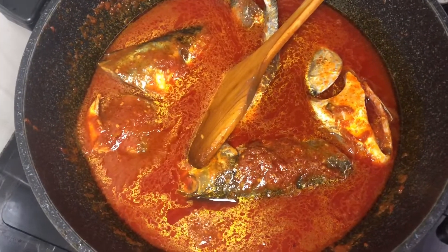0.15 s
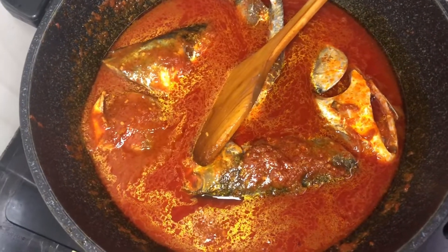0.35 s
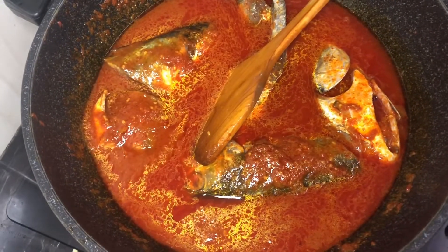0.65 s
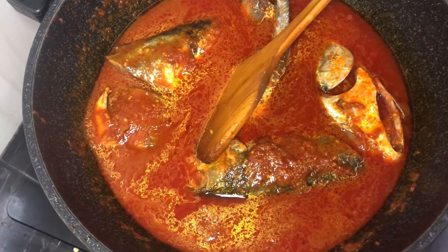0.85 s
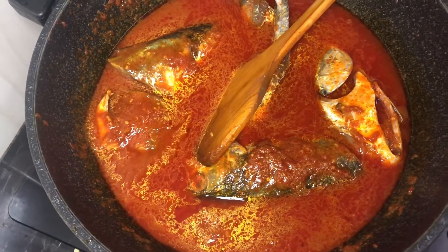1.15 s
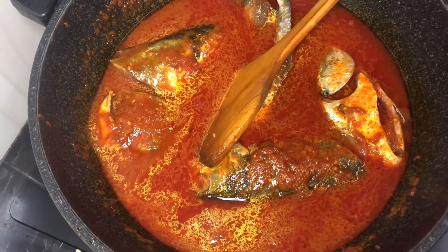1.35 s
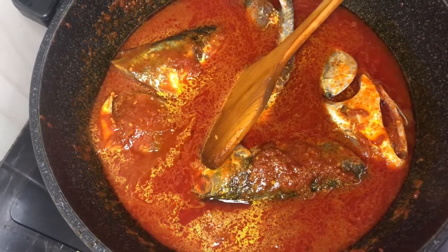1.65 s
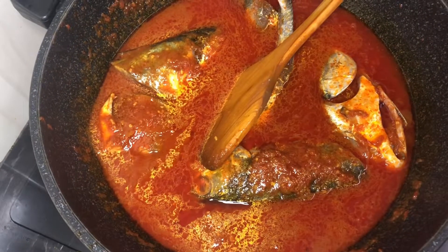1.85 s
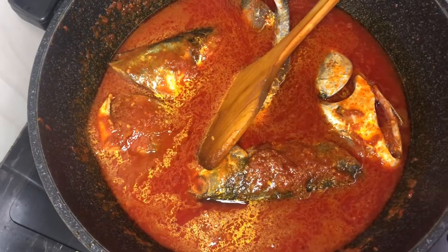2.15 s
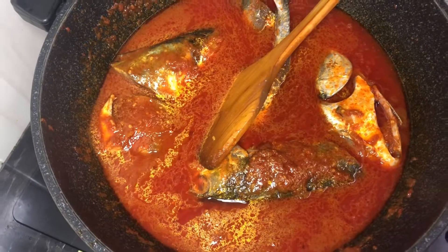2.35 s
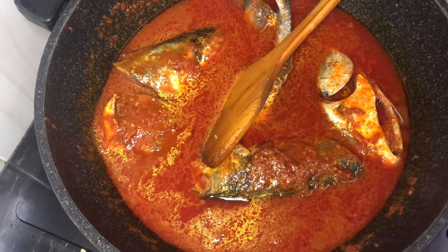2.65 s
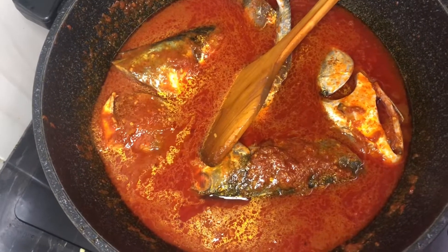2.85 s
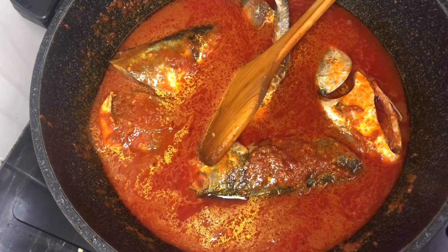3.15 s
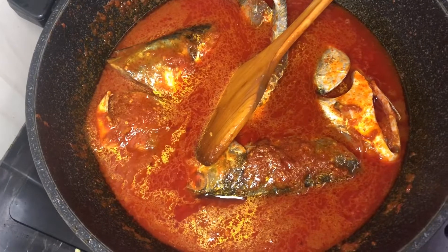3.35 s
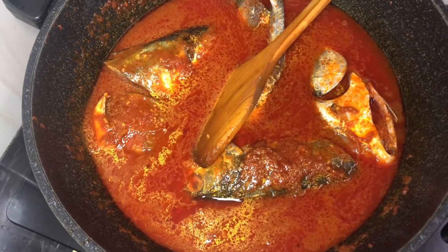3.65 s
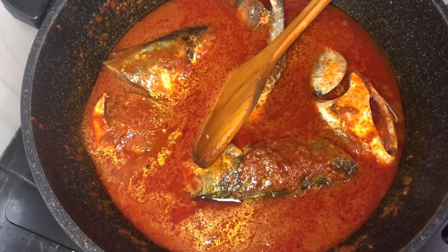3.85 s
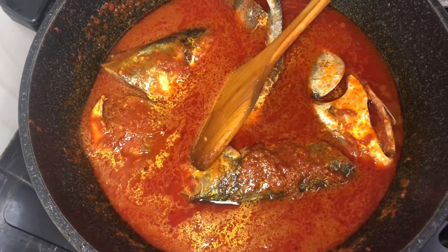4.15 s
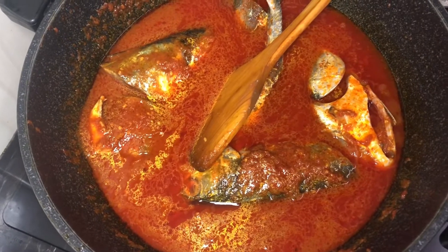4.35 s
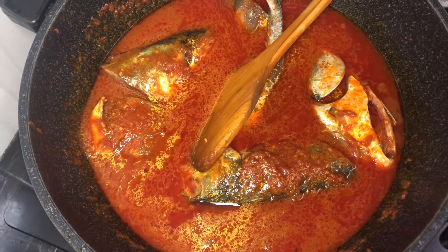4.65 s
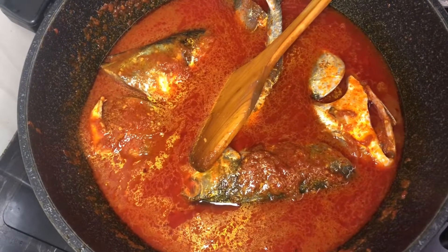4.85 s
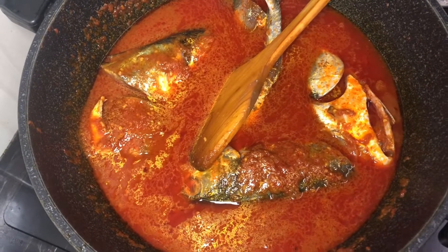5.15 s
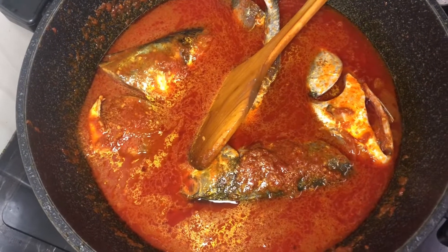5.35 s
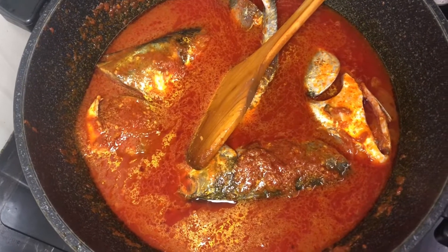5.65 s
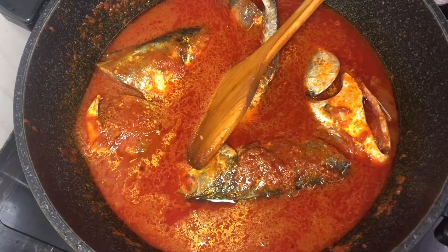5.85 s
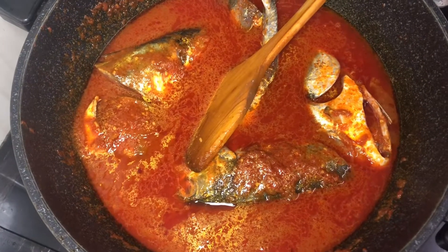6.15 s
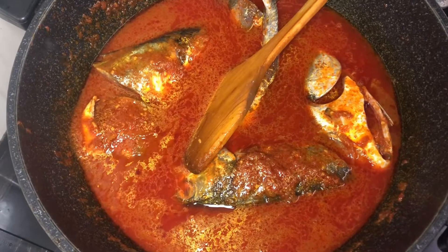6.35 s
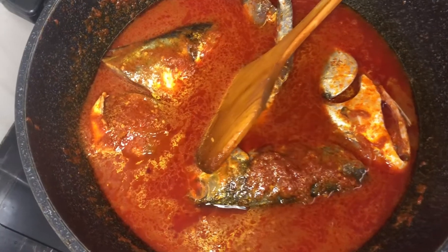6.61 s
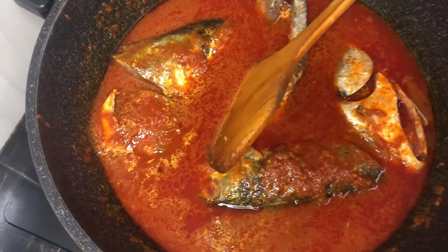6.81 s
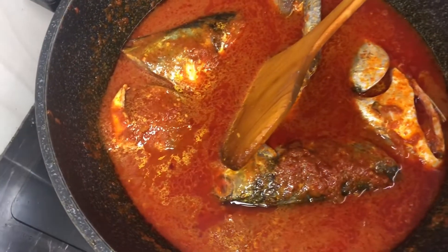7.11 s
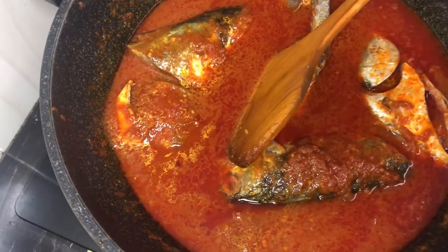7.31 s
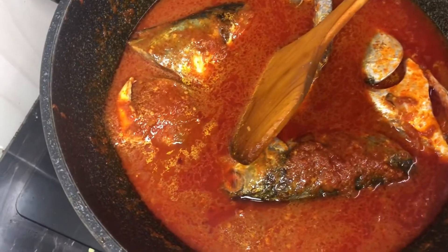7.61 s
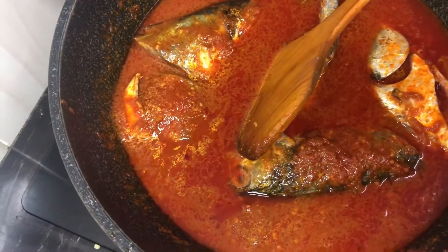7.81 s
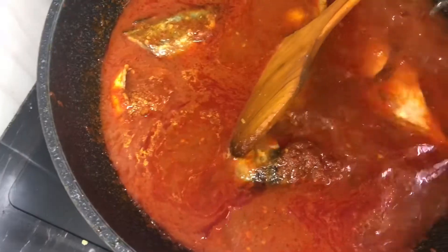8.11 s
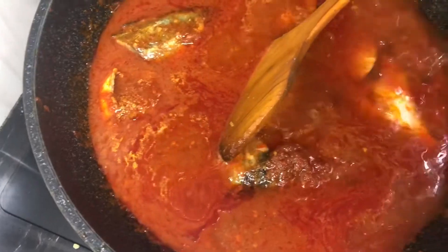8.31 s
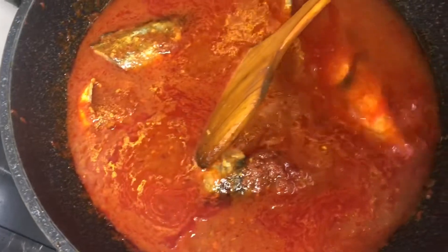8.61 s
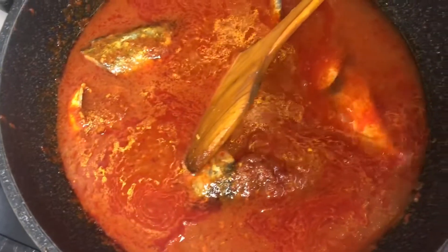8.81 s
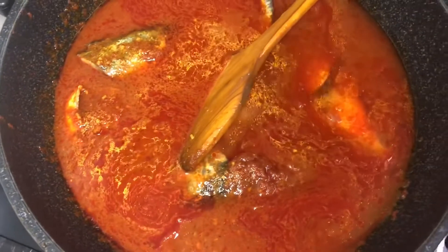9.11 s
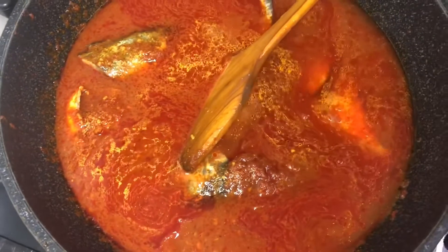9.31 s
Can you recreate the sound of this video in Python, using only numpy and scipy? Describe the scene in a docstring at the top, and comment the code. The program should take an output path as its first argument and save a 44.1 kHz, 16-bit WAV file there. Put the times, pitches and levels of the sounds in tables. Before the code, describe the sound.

A pan of stew simmers softly close by, over a low appliance hum and rush of air. Across the kitchen a tap hisses on thin metal, and a pot knocks, scrapes and clinks in a booming sink, then fills with churning water. The tap stops. Water gushes and drips into the near pan, the sound briefly fades out and returns, the stew seethes, and a wooden spatula knocks the pan.

```python
"""A pan of stew simmers over appliance hum: a soft rush of air, with tiny bubbles spitting at the hot rim.
A tap hisses on thin metal. Across the kitchen a pot knocks, scrapes and clinks in the booming sink,
then churns and sings as it fills. A faint sizzle lingers, then water gushes and drips into the pan,
each drop a slap and a bubble; the stew seethes, the spitting flares and a wooden spatula knocks the pan.
The whole sound fades out and back in once, near 8 s."""
import sys
import numpy as np
from scipy import signal
from scipy.io import wavfile
from scipy.ndimage import uniform_filter1d

SR = 44100
rng = np.random.default_rng(int(sys.argv[2]) if len(sys.argv) > 2 else 0)


def master(y):
    """Save y as 16-bit WAV."""
    cut = np.clip(np.atleast_2d(y).T, -1, 1)
    pcm = np.round(cut * 32767)  # scale
    wavfile.write(sys.argv[1], SR, pcm.astype(np.int16))


N = 417627
T = np.arange(N) / SR

# Noise and impact spectra. Each row: frequency in Hz, relative level in dB.
AIR_SPECTRUM = [(15, -60), (25, -32), (64, -35.5), (80, -5.5), (102, -3.5), (161, -12.5), (189, -10),
                (333, -23.5), (557, -24), (691, -22), (1040, -23.5), (1780, -27.5), (2150, -28),
                (6850, -37.5), (15800, -47.5)]
SEETHE_SPECTRUM = [(400, -22), (900, -9.5), (1450, -2), (1900, -6.5), (2400, -4.5), (3100, -3), (4200, -9),
                   (6000, -13), (8500, -21.5), (15500, -17)]
SPRAY_SPECTRUM = [(500, -12.5), (1500, -1.5), (3000, -5.5), (5000, -2.5), (7000, -0.5), (9500, -1.5),
                  (12000, 0.5), (15500, -0.5)]
CHURN_SPECTRUM = [(400, -28), (1000, -7), (1500, -11.5), (1900, -3), (3300, -2), (4600, -3), (7000, -7.5),
                  (10000, -12)]
SINK_SPECTRUM = [(300, -27.5), (560, -8.5), (700, 2), (950, 2.5), (1400, -5), (2600, -1), (4500, -7),
                 (9000, -9.5), (15500, -16.5)]
RATTLE_SPECTRUM = [(60, -24), (130, -1), (250, 2), (450, -12.5), (900, -26), (4000, -62)]
POT_SPECTRUM = [(500, -27), (1500, -13.5), (1900, -3), (2600, -3), (3300, -1), (4800, -4), (5700, -4),
                (6800, -5), (8000, -5), (11000, -8), (15500, -15.5)]
WOOD_SPECTRUM = [(300, -17), (600, -7), (1300, -3), (2500, 8), (4000, 1.5), (6300, -2), (7500, -16),
                 (15500, -19)]
# Hollow resonances of hob and filling pot. Each row: centre in Hz, width in Hz, strength in dB.
HOB_PEAKS = [(440, 147, -1), (707, 88, -2), (930, 18, -0.5), (1390, 120, -8.5), (1824, 94, -2)]
POT_PEAKS = [(1820, 87, -12), (2150, 84, -3.5), (2800, 220, -7), (3260, 130, -5), (6800, 610, -9)]
# Modes of struck bodies. Each row: frequency in Hz, relative level in dB, free-ringing T60 in seconds.
SINK_RING_MODES = [(613, 0, .35), (725, -4, .25), (862, -3, .18), (915, -4, .12), (1135, -9, .5),
                   (1280, -10, .2), (1482, -5, .2), (2325, -9, .15), (2490, -6, .17), (2915, -11, .1)]
BASIN_MODES = [(108.6, -2, 0.16), (164, -4.5, 0.18), (195, -3, 0.35), (228, 5, 0.13), (286, -7, 0.11),
               (465, -5.5, 0.26)]
POT_WALL_MODES = [(1781, -4, .35), (3193, 2, .2), (3397, 1, .18), (4680, 0, .07), (4862, 0, .16),
                  (5920, -6, .14), (6725, 0, .2), (6888, -2, .14), (9700, -5, .15), (14000, -4, .1)]
PAN_MODES = [(153, -3.5, 0.13), (263, -6, 0.079), (332, -1.5, 0.058), (380, 5, 0.059), (420, -10, 0.063)]
# Level curves of seething stew, jet on metal and churn in the pot. Each row: time in seconds, level in dB.
SEETHE_CURVE = [(7.05, -60), (7.9, -57), (8.25, -52.5), (8.55, -47), (9.1, -47), (9.46, -57)]
JET_CURVE = [(.5, -46.5), (.7, -44), (.87, -38), (1.18, -43), (1.45, -50.5), (2.75, -44), (3.35, -50),
             (3.7, -46), (4.1, -43), (4.5, -47.5), (5.8, -46.5)]
CHURN_CURVE = [(1.7, -45.5), (2.85, -41.5), (3.25, -45.5), (3.7, -41), (4.0, -46), (4.45, -44), (4.9, -43),
               (5.45, -43), (5.8, -44)]
# Appliance tones. Each row: frequency in Hz, RMS level in dB.
HUM_TONES = [(49, -63.5), (93.6, -50.5), (100.05, -44), (120.2, -52.5), (130.1, -56.5), (186, -74),
             (200.1, -60.5), (231, -60)]
# Pot knocks on the sink. Each row: start in seconds, relative level in dB, spot note in Hz.
POT_KNOCKS = [(1.187, -21, 1600), (1.243, -26.5, 2800), (1.442, -31, 2450), (1.513, -31.5, 3040),
              (1.575, -29.5, 2470), (1.633, -23, 2690), (1.673, -28.5, 1380), (2.463, -29, 1190),
              (2.513, -31.5, 2000), (2.685, -26.5, 2910), (3.315, -36.5, 1230)]
# Pot scrapes. Each row: start in seconds, relative level in dB, decay in seconds, spot note in Hz.
POT_SCRAPES = [(1.283, -31.5, 0.11, 900), (1.532, -23, 0.024, 930), (1.612, -30.5, 0.022, 900),
               (1.719, -24.5, 0.046, 1200), (2.555, -42.5, 0.091, 615), (2.72, -36.5, 0.069, 2420)]
# Booms of the sink floor. Each row: start in seconds, relative level in dB.
BASIN_BOOMS = [(1.2476, -15.5), (1.324, -24), (1.381, -24.5)]
# Clinks and slides. Each row: start in seconds, relative level in dB, decay in seconds,
# tilt in dB per octave, spot note in Hz.
POT_CLINKS = [(2.0111, -19.5, 0.011, -2.5, 4780), (2.045, -24, 0.072, 3, 6800),
              (2.088, -25.5, 0.026, 5, 3320), (2.932, -27, .016, -3.5, 6960), (2.962, -35, 0.031, -5, 4960)]
# A faint lingering sizzle, then gushes of water. Each row: start in seconds, level in dB,
# rise in seconds, decay in seconds.
SIZZLE_AND_GUSHES = [(6.15, -59, .02, 1), (7.062, -40, 0.06, 0.1), (7.53, -40.5, .03, 0.054),
                     (7.745, -45, .03, 0.084)]
# Drops into the stew. Each row: start in seconds, level in dB, bubble pitch in Hz, slap in dB re bubble.
WATER_DROPS = [(7.264, -41.5, 7140, 4.5), (7.298, -34.5, 6760, -6.5), (7.4633, -28, 1256, -4),
               (7.473, -35, 8240, 2.5), (7.481, -38, 2800, 4), (7.525, -29.5, 1210, -3),
               (7.536, -25.5, 1406, -1.5), (7.541, -30, 485, -14), (7.554, -26.5, 2800, -7),
               (7.607, -35, 6800, 3), (7.719, -28, 3660, -8), (7.746, -32, 12800, -2.5),
               (7.789, -33.5, 13000, -2), (7.821, -31.5, 510, 4), (7.841, -39, 1730, 1),
               (8.257, -41, 9000, -7), (8.336, -32, 14200, -15), (8.361, -38, 12300, -11)]
# Spatula on pan. Each row: start in seconds, crack level in dB, crack decay in seconds,
# tilt in dB per octave, thud level in dB.
SPATULA_HITS = [(7.8171, -21.5, 0.003, -0.5, -51), (9.2283, -25, 0.006, -3.5, -22),
                (9.2886, -31, 0.0062, -4.5, -28)]
# Kitchen reverberation. Each row: frequency in Hz, T60 in seconds.
ROOM_T60 = [(150, 1), (1000, 0.4), (5000, 0.47), (15000, 0.13)]


def amp(db):
    return 10 ** (np.asarray(db) / 20)


def unit_rms(x):
    return x / np.sqrt(np.mean(x ** 2) + 1e-20)


def at_hz(rows, hz):
    row_hz, values = np.transpose(rows)
    return np.interp(np.log(hz + 1), np.log(row_hz + 1), values)


def curve_gain(rows):
    times_s, db = np.transpose(rows)
    return amp(np.interp(T, times_s, db))


def held(start_s, end_s, rise_s, fall_s):
    """Linear rise, hold until end_s, exponential fall."""
    return np.clip((T - start_s) / rise_s, 0, 1) * np.exp(-np.maximum(T - end_s, 0) / fall_s)


def add(mix, start_s, sound):
    part = mix[round(start_s * SR):][:len(sound)]
    part += sound[:len(part)]


def colour(x, spectrum, tilt_db_oct=0, peaks=()):
    """Minimum-phase filter of unit energy: a tilted spectrum with resonant humps."""
    hz = np.fft.rfftfreq(8192, 1 / SR)
    gain = amp(at_hz(spectrum, hz) + tilt_db_oct * np.log2(hz + 1))
    gain *= 1 + sum(amp(db) / (1 + (2 * (hz - centre) / width) ** 2) for centre, width, db in peaks)
    log_gain = np.log(np.concatenate([gain, gain[-2:0:-1]]))
    taps = np.fft.ifft(np.exp(np.conj(signal.hilbert(log_gain)))).real[:len(hz)]
    return signal.oaconvolve(x, taps / np.linalg.norm(taps))[:len(x)]


def patchy(x, depth_db, bins, frames):
    """Random patches of loudness across frequency and time."""
    spectra = signal.stft(x, nperseg=512)[2]
    patches = uniform_filter1d(rng.standard_normal(spectra.shape), bins, axis=0)
    patches = unit_rms(uniform_filter1d(patches, frames, axis=1))
    return unit_rms(signal.istft(spectra * amp(depth_db * patches), nperseg=512)[1][:N])


def bubble(hz, decay_s, t, glide=0.026):
    """A bubble rings, rising in pitch as it nears the surface."""
    pitch_hz = hz * (1 + glide * np.minimum(t / decay_s, 2))
    return np.sin(2 * np.pi * np.cumsum(pitch_hz) / SR) * np.exp(-t / decay_s) * (1 - np.exp(-t * hz))


def droplets(per_s, spread_db, lo_hz, hi_hz, decay_cycles, pitches=36):
    """Tiny bubbles ping at random times; a few are loud."""
    strength = amp(spread_db * np.minimum(rng.exponential(1, N), 4))
    pulses = strength * rng.choice([-1, 1], N) * (rng.random(N) < per_s / SR)
    pitch_index = rng.integers(0, pitches, N)
    out = np.zeros(N)
    for k, hz in enumerate(np.geomspace(lo_hz, hi_hz, pitches)):
        ping = unit_rms(bubble(hz, decay_cycles / hz, T[:1024]))
        out += signal.oaconvolve(pulses * (pitch_index == k), ping)[:N]
    return unit_rms(out)


def simmer(air_db=-45, spit_db=-69.5, flare_db=-52):
    """Steady air round the hob; late on the stew seethes. The hot rim spits, flaring when wet."""
    air = patchy(rng.standard_normal(N), depth_db=1.3, bins=8, frames=8)
    air = colour(air, AIR_SPECTRUM, peaks=HOB_PEAKS)
    hum_gap = signal.butter(2, [88, 108], "bandstop", fs=SR, output="sos")
    air = unit_rms(signal.sosfilt(hum_gap, air))
    seethe = patchy(rng.standard_normal(N), depth_db=2.1, bins=8, frames=5)
    seethe = unit_rms(colour(seethe, SEETHE_SPECTRUM))
    seethe_gain = curve_gain(SEETHE_CURVE) * (T > SEETHE_CURVE[0][0])
    spits = droplets(per_s=210, spread_db=4.5, lo_hz=8000, hi_hz=16100, decay_cycles=3.3)
    flare = amp(flare_db) * held(start_s=7.82, end_s=8.35, rise_s=0.41, fall_s=0.034)
    return amp(air_db) * air + seethe_gain * seethe + (amp(spit_db) + flare) * spits


def appliance_hum(waver_rad=0.17):
    """Mains and motor tones wander slightly and beat."""
    out = np.zeros(N)
    knots_s = np.linspace(0, T[-1], num=24)
    for hz, db in HUM_TONES:
        drift_rad = waver_rad * np.interp(T, knots_s, rng.standard_normal(len(knots_s)))
        out += np.sqrt(2) * amp(db) * np.sin(2 * np.pi * (hz * T + rng.random()) + drift_rad)
    return out


def shell(x, t60_s):
    """Dense, short resonances of thin metal, different at every spot."""
    t = T[:SR // 8]
    response = rng.standard_normal(len(t)) * amp(-60 * t / t60_s)
    return signal.oaconvolve(x, response / np.linalg.norm(response))[:len(x)]


def ring(modes):
    """Decaying sines of a struck body."""
    t = T[:SR // 2]
    return sum(amp(db - 60 * t / t60_s) * np.sin(2 * np.pi * hz * t) for hz, db, t60_s in modes)


def resonate(x, modes):
    """Modes driven by x, at unit RMS."""
    return unit_rms(signal.oaconvolve(x, ring(modes))[:len(x)])


def spray():
    """Water hisses as it breaks up on thin metal."""
    hiss = colour(patchy(rng.standard_normal(N), depth_db=3.0, bins=28, frames=5), SPRAY_SPECTRUM)
    return unit_rms(hiss + 0.45 * shell(hiss, t60_s=0.09))


def tap(open_s=0.487, shut_s=5.8, pot_free_s=2.83, sing_db=-57, ring_out_db=-44.5):
    """The jet drums on metal and churns in the pot; standing free, the pot rings out, then sings on."""
    settle_s, shut_fall_s, wet_t60_s = 0.12, 0.07, 0.04
    bubbles = droplets(per_s=900, spread_db=2.5, lo_hz=900, hi_hz=9250, decay_cycles=15.4)
    churn = patchy(rng.standard_normal(N) + 0.52 * bubbles, depth_db=1.8, bins=12, frames=14)
    churn += 0.5 * shell(churn, t60_s=0.12)
    churn = unit_rms(colour(churn, CHURN_SPECTRUM, peaks=POT_PEAKS))
    lowest_hz = POT_WALL_MODES[0][0]
    pot_note = resonate(churn, [(lowest_hz, 0, wet_t60_s)])
    jet_gain = curve_gain(JET_CURVE) * held(open_s, shut_s, rise_s=0.023, fall_s=shut_fall_s)
    churn_gain = curve_gain(CHURN_CURVE) * held(CHURN_CURVE[0][0], shut_s, settle_s, shut_fall_s)
    singing = amp(sing_db) * held(pot_free_s, shut_s, settle_s, shut_fall_s)
    ring_out = amp(ring_out_db) * held(pot_free_s, pot_free_s + settle_s, settle_s, fall_s=0.26)
    return jet_gain * spray() + churn_gain * churn + (singing + ring_out) * pot_note


def contact(rise_s, decay_s):
    """Noise burst of two surfaces meeting."""
    t = T[:SR // 2]
    envelope = np.minimum(t / rise_s, 1) * np.exp(-np.maximum(t - rise_s, 0) / decay_s)
    return envelope * rng.standard_normal(len(t))


def clatter(blows, spectrum, modes, ring_db, shell_db, spot_db, spot_t60_s):
    """Each blow sounds directly and rings the metal; the struck spot adds its own short note."""
    out = np.zeros(N)
    for start_s, db, rise_s, decay_s, tilt_db_oct, spot_hz in blows:
        force = contact(rise_s, decay_s)
        body = amp(ring_db) * resonate(force, modes)
        spot = amp(spot_db) * resonate(force, [(spot_hz, 0, spot_t60_s)])
        knock = colour(force, spectrum, tilt_db_oct)
        knock = unit_rms(knock + amp(shell_db) * shell(knock, t60_s=0.042))
        add(out, start_s, amp(db) * np.std(force) * (knock + body + spot))
    return out


def pot_on_sink(knock_rise_s=0.0004, knock_decay_s=0.023, scrape_rise_s=0.012):
    """Sharp knocks and softer-edged scrapes; a stiffer spot rings higher and brighter."""
    knocks = [(start_s, db, knock_rise_s, knock_decay_s, hz) for start_s, db, hz in POT_KNOCKS]
    scrapes = [(start_s, db, scrape_rise_s, decay_s, hz) for start_s, db, decay_s, hz in POT_SCRAPES]
    blows = []
    for start_s, db, rise_s, decay_s, spot_hz in knocks + scrapes:
        tilt_db_oct = -1.5 + 2.1 * np.log2(spot_hz / 1500)
        blows.append((start_s, db, rise_s, decay_s, tilt_db_oct, spot_hz))
    return clatter(blows, SINK_SPECTRUM, SINK_RING_MODES,
                   ring_db=-4.5, shell_db=2.0, spot_db=-9.5, spot_t60_s=0.035)


def basin_booms(rise_s=0.0056, damping_s=0.19, rattle_db=-8.5):
    """The sink floor booms, damped by the weight of the pot, which rattles on it."""
    out, t = np.zeros(N), T[:SR // 2]
    boom = ring(BASIN_MODES) * (1 - np.exp(-t / rise_s)) * np.exp(-t / damping_s)
    for start_s, db in BASIN_BOOMS:
        rattle = colour(contact(rise_s=0.004, decay_s=0.031), RATTLE_SPECTRUM)
        add(out, start_s, amp(db) * (boom + amp(rattle_db) * rattle))
    return out


def pot_clinks(clink_rise_s=0.0005, slide_rise_s=0.005, longest_clink_s=0.02):
    """Metal on metal rings the pot wall; slides start more softly than clinks."""
    blows = []
    for start_s, db, decay_s, tilt_db_oct, spot_hz in POT_CLINKS:
        rise_s = slide_rise_s if decay_s > longest_clink_s else clink_rise_s
        blows.append((start_s, db, rise_s, decay_s, tilt_db_oct, spot_hz))
    return clatter(blows, POT_SPECTRUM, POT_WALL_MODES,
                   ring_db=-8.5, shell_db=8.5, spot_db=-4.5, spot_t60_s=0.018)


def sizzle_and_gushes(patter_db=-11):
    """A faint lingering sizzle, then gushes of water: each swells and dies as hiss and droplet patter."""
    patter = droplets(per_s=610, spread_db=3.5, lo_hz=2000, hi_hz=14000, decay_cycles=4)
    envelope = sum(amp(db) * held(start_s, start_s + rise_s, rise_s, decay_s)
                   for start_s, db, rise_s, decay_s in SIZZLE_AND_GUSHES)
    return envelope * unit_rms(spray() + amp(patter_db) * patter)


def splashes():
    """Each drop slaps the stew and traps a bubble; smaller bubbles die sooner, with a brighter slap."""
    out = np.zeros(N)
    for start_s, db, hz, slap_db in WATER_DROPS:
        khz = hz / 1000
        force = contact(rise_s=0.00086, decay_s=0.0079)
        slap = colour(force, SPRAY_SPECTRUM, tilt_db_oct=-3.5 + np.log2(khz), peaks=[(hz, hz / 2, 10)])
        ping = bubble(hz, decay_s=0.0077 * khz ** -0.34, t=T[:len(slap)])
        add(out, start_s, amp(db) * (ping + amp(slap_db) * slap))
    return out


def spatula(crack_rise_s=0.0004, thud_rise_s=0.0035, thud_lag_s=0.0029):
    """Wood cracks on the heavy pan, which answers with a dull thud."""
    out = np.zeros(N)
    thud = ring(PAN_MODES) * (1 - np.exp(-T[:SR // 2] / thud_rise_s))
    for start_s, crack_db, decay_s, tilt_db_oct, thud_db in SPATULA_HITS:
        crack = colour(contact(crack_rise_s, decay_s), WOOD_SPECTRUM, tilt_db_oct)
        add(out, start_s, amp(crack_db) * crack)
        add(out, start_s + thud_lag_s, amp(thud_db) * thud)
    return out


def kitchen(x, wet_db, predelay_s=0.004):
    """Direct sound plus a room tail; each band decays at its own rate."""
    noise = rng.standard_normal(SR // 2) * (T[:SR // 2] > predelay_s)
    hz, t, spectra = signal.stft(noise, SR, nperseg=256)
    decay = amp(-60 * t / at_hz(ROOM_T60, hz)[:, None])
    tail = signal.istft(spectra * decay, SR, nperseg=256)[1]
    return x + amp(wet_db) * signal.oaconvolve(x, tail / np.linalg.norm(tail))[:N]


def scene():
    """Sink across the room, pan close; mono on two channels."""
    far = amp(-2) * kitchen(pot_on_sink() + basin_booms() + pot_clinks(), wet_db=-8.5)
    near = kitchen(splashes() + spatula(), wet_db=-12.0)
    mono = simmer() + appliance_hum() + tap() + far + sizzle_and_gushes() + near
    return np.array([mono, mono])


def record(dry, bass_cut_hz=38, band_limit_hz=16050, fade_out_s=7.903, silent_s=8.04, restored_s=8.188):
    """Microphone bass cut, a brief fade to silence and back, then the band limit."""
    highpass = signal.butter(4, bass_cut_hz, "highpass", fs=SR, output="sos")
    fade = np.interp(T, [fade_out_s, silent_s, restored_s], [1, 0, 1]) ** 1.54
    lowpass = signal.firwin(511, band_limit_hz, window=("kaiser", 9), fs=SR)
    return signal.oaconvolve(signal.sosfilt(highpass, dry) * fade, lowpass[None], "same")


dry = scene()
out = record(dry)
master(out)
```